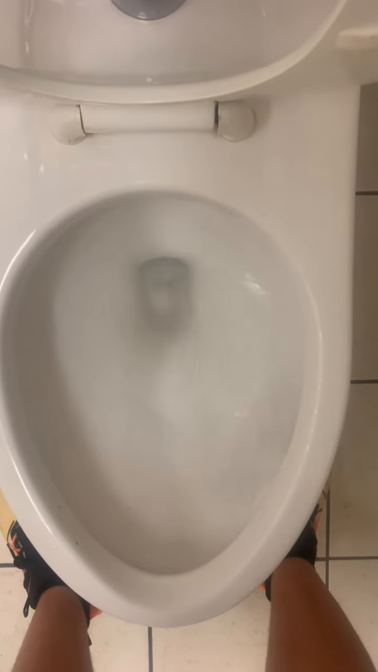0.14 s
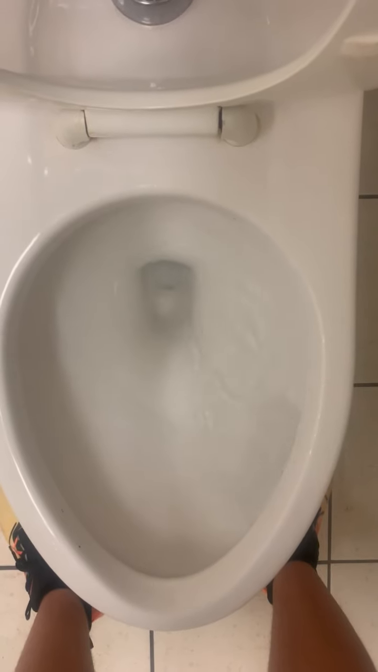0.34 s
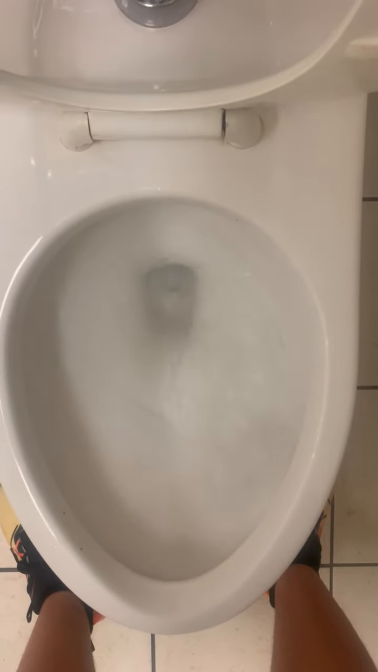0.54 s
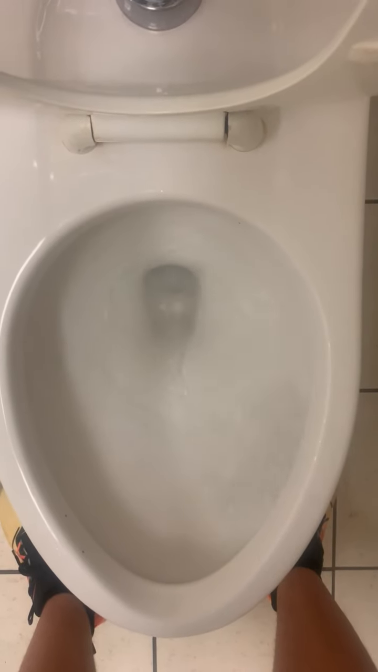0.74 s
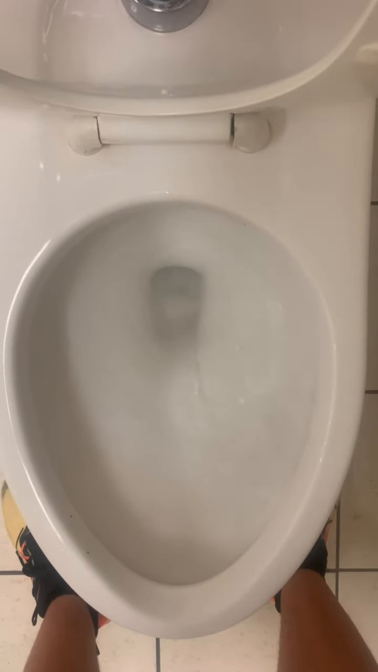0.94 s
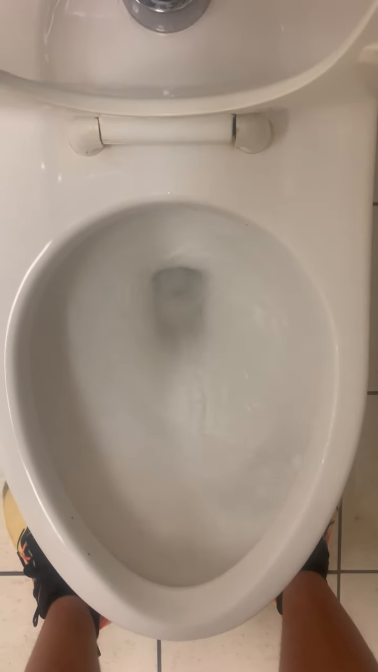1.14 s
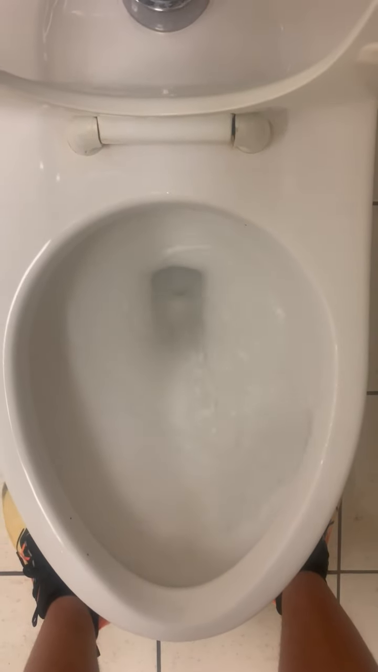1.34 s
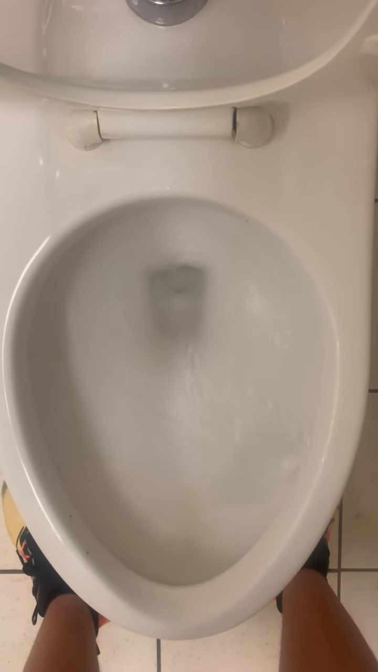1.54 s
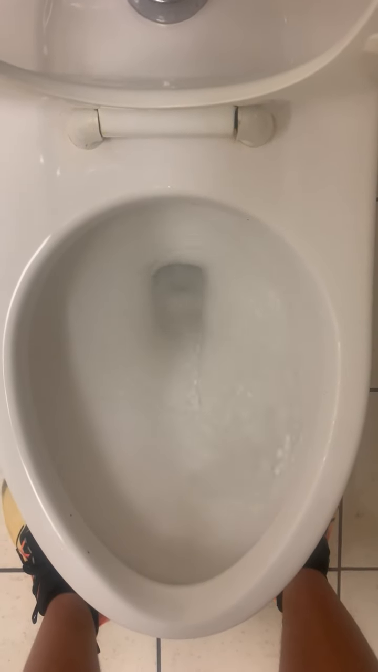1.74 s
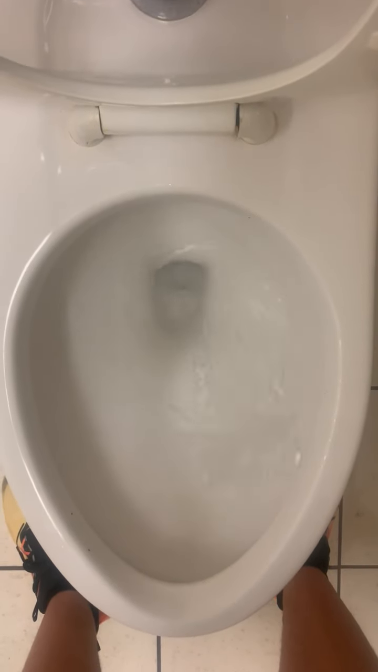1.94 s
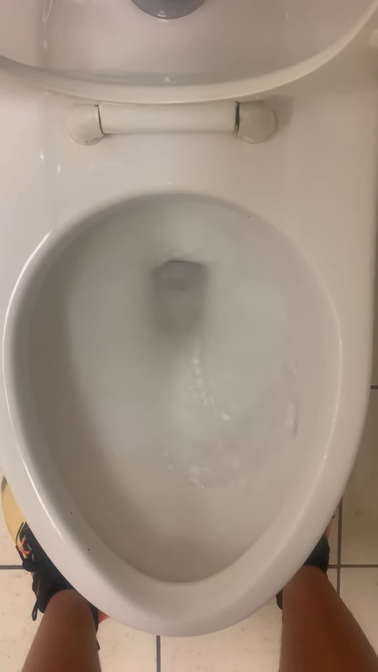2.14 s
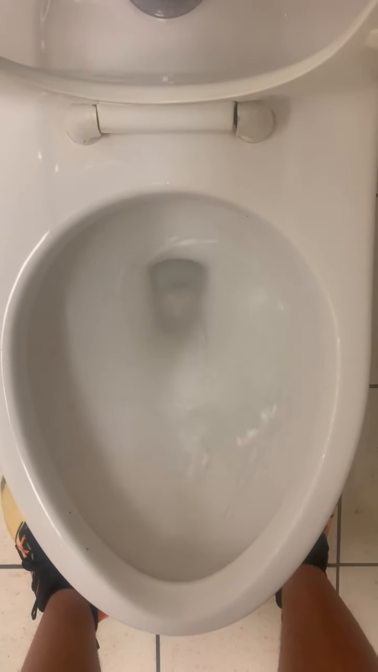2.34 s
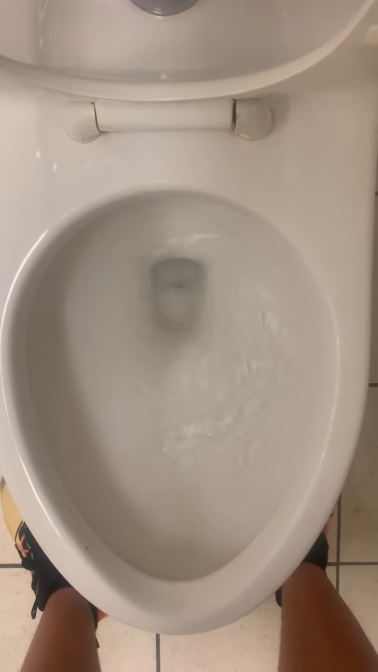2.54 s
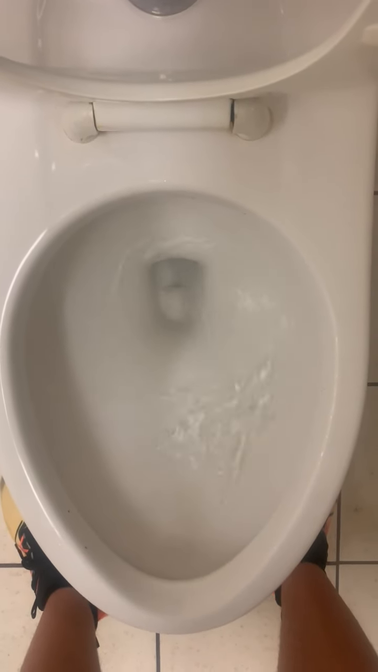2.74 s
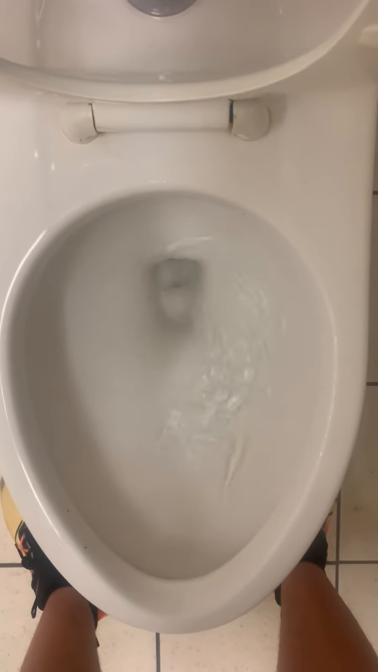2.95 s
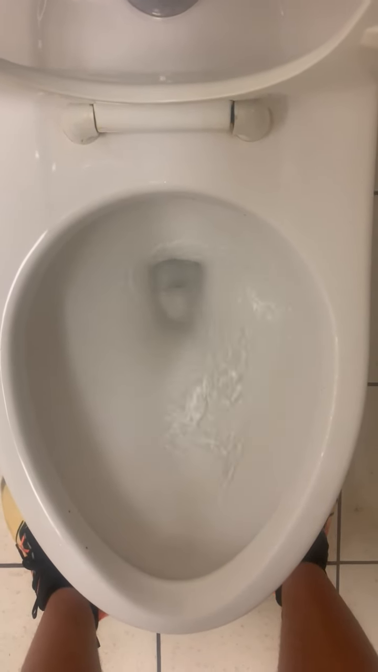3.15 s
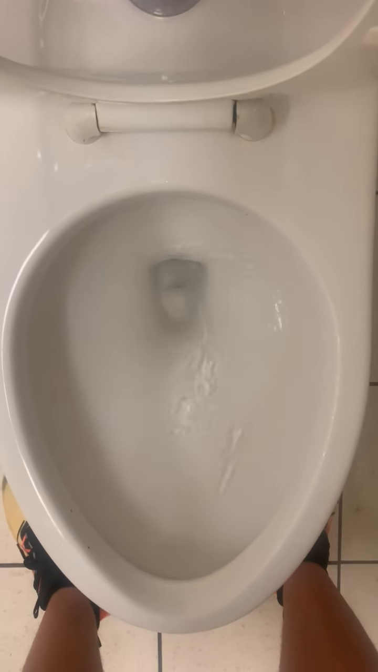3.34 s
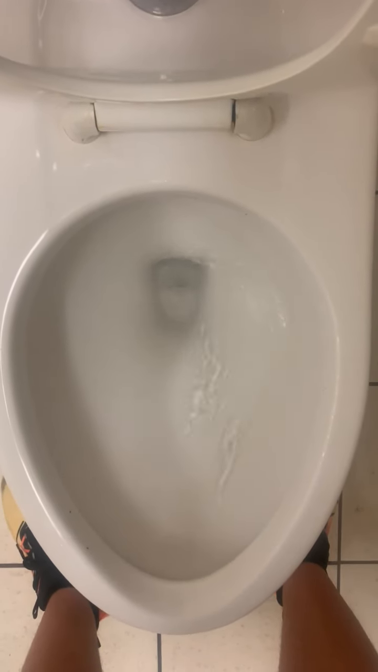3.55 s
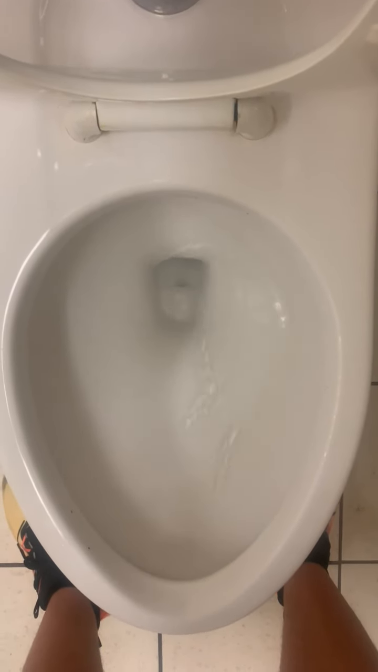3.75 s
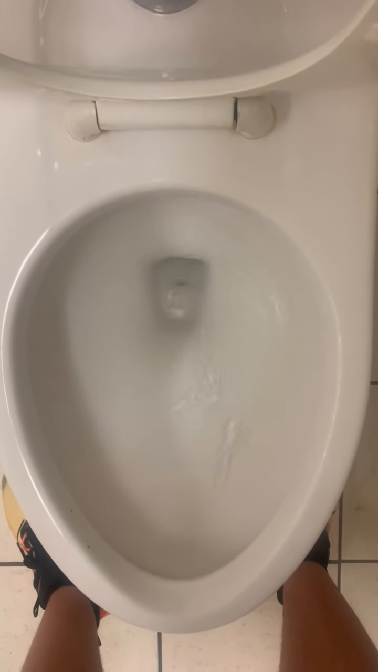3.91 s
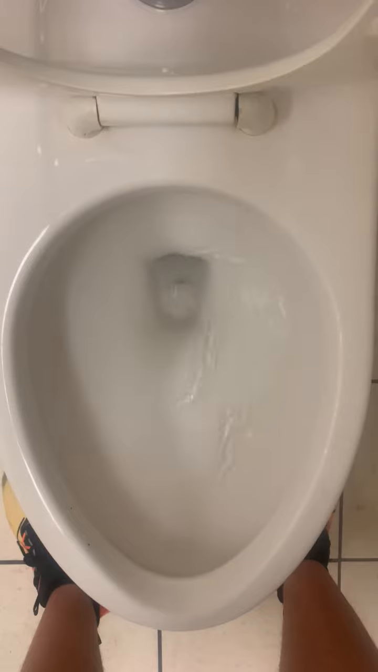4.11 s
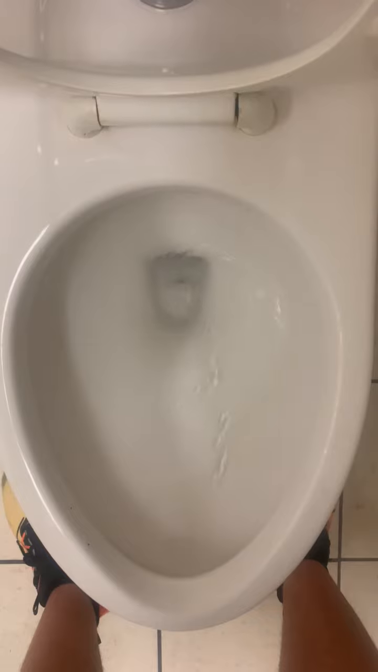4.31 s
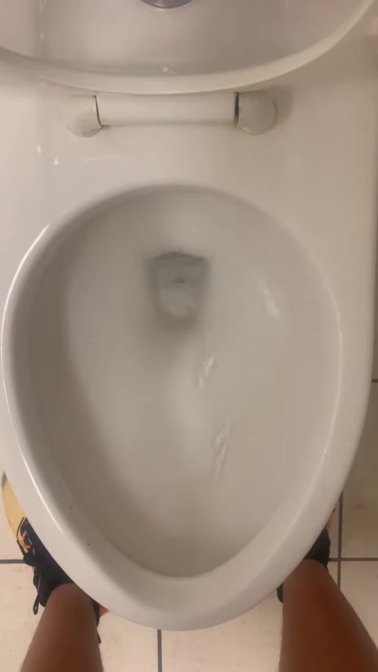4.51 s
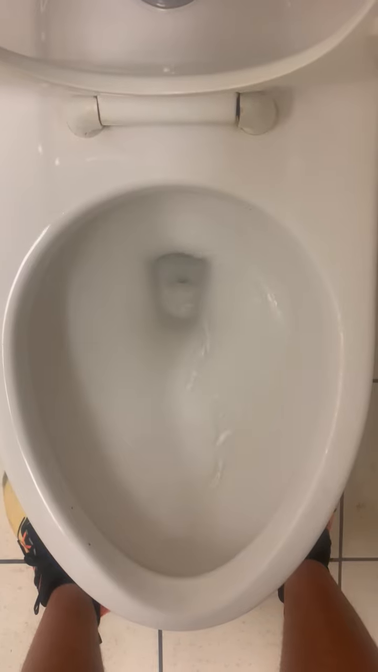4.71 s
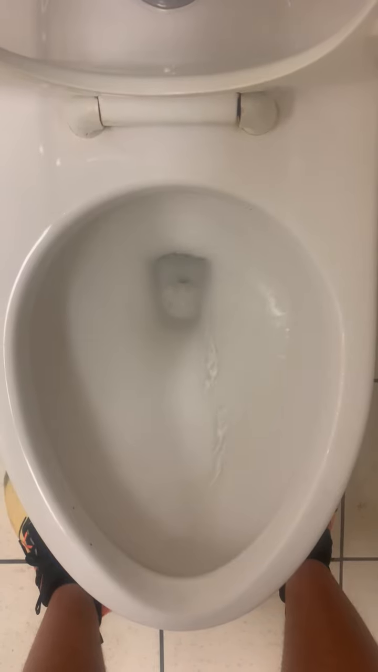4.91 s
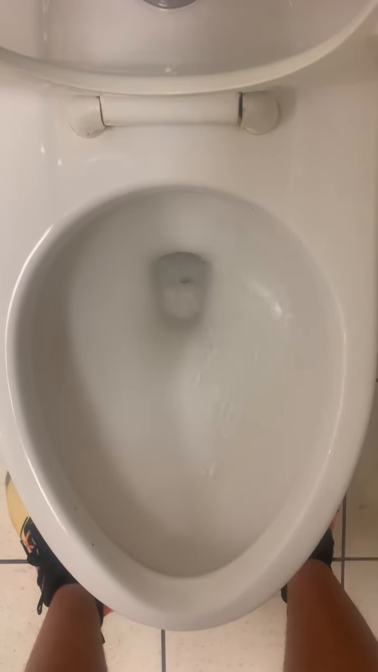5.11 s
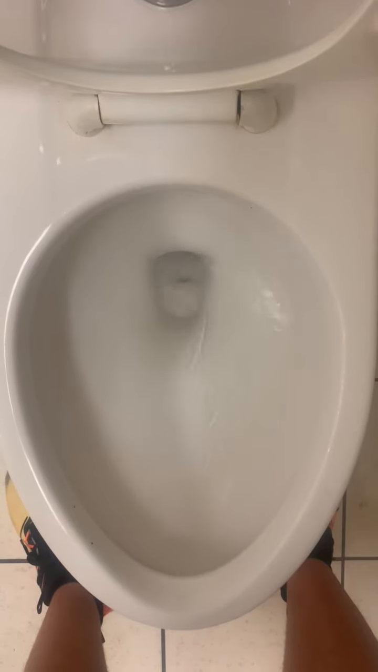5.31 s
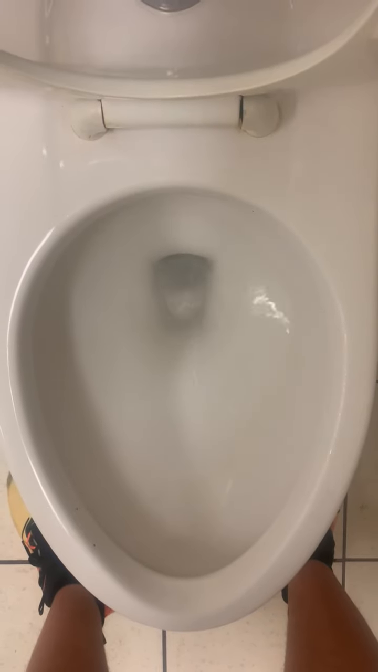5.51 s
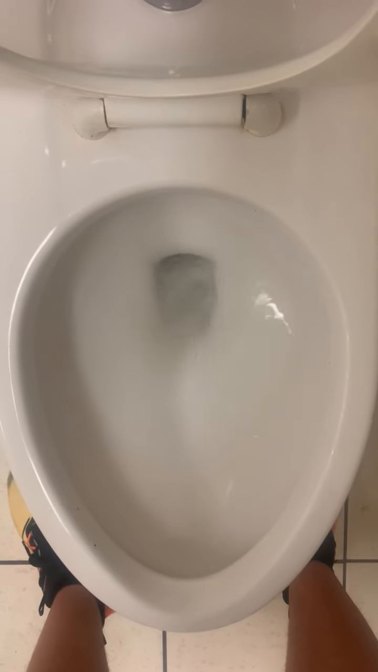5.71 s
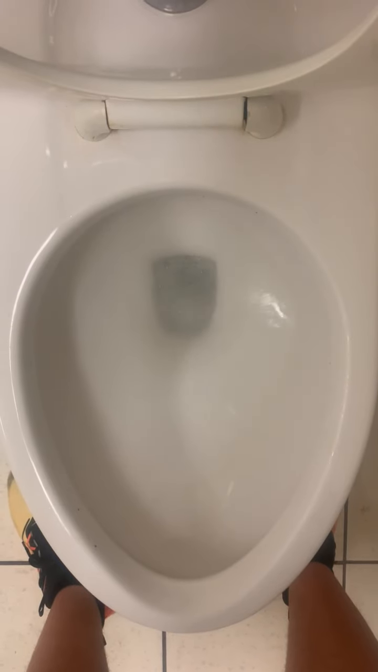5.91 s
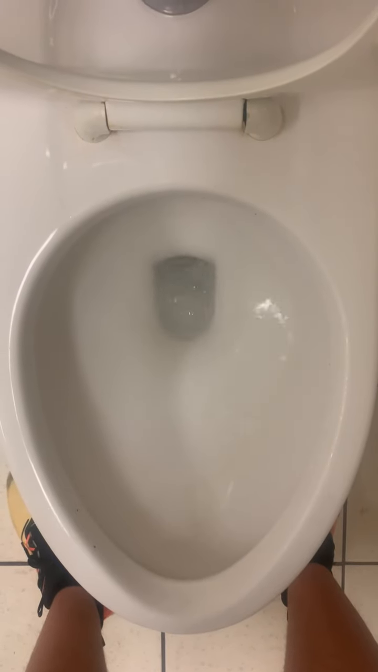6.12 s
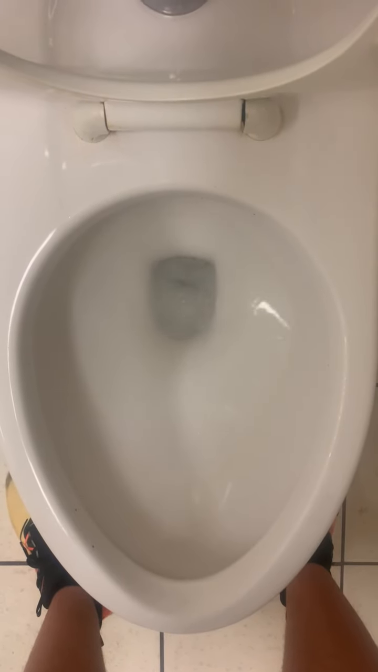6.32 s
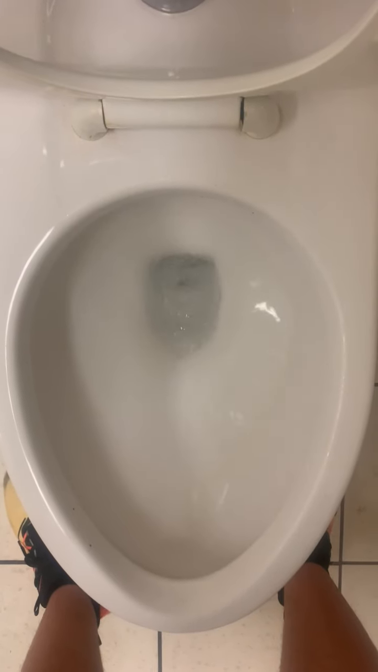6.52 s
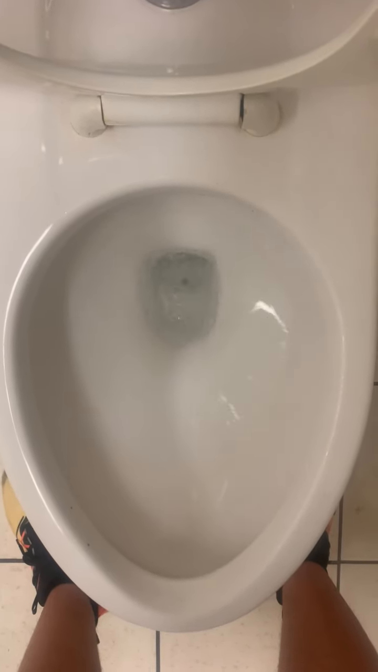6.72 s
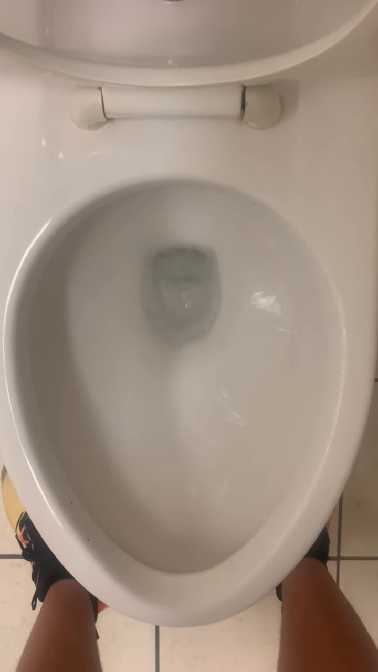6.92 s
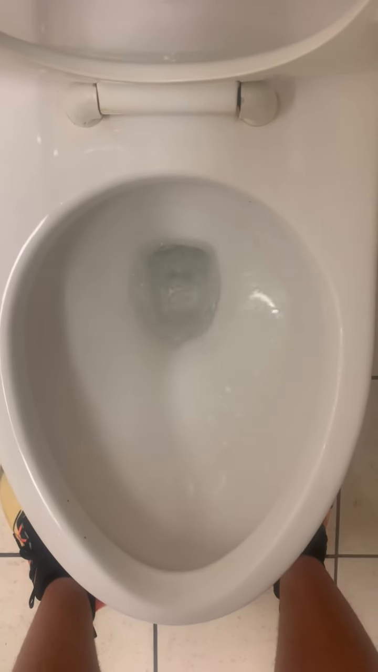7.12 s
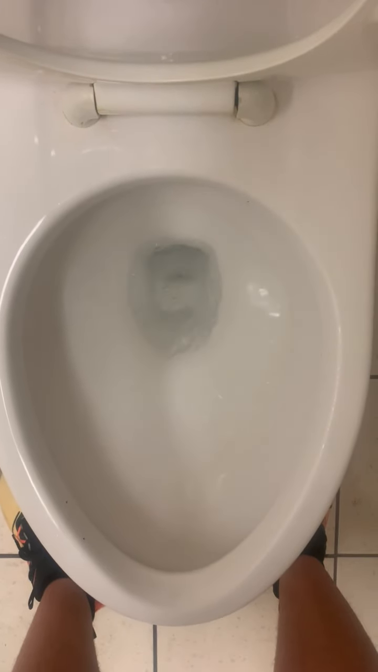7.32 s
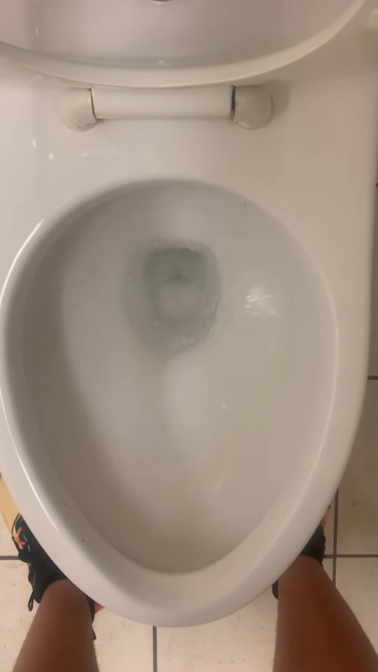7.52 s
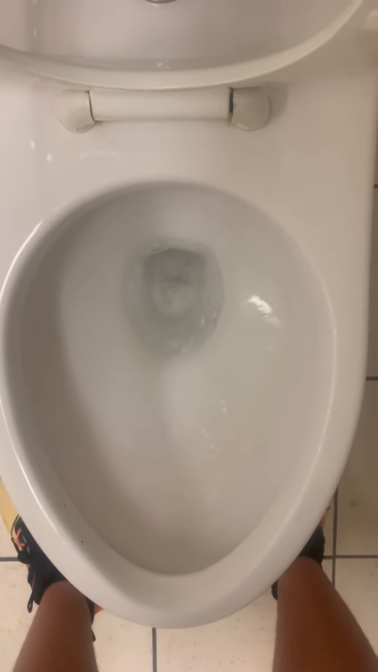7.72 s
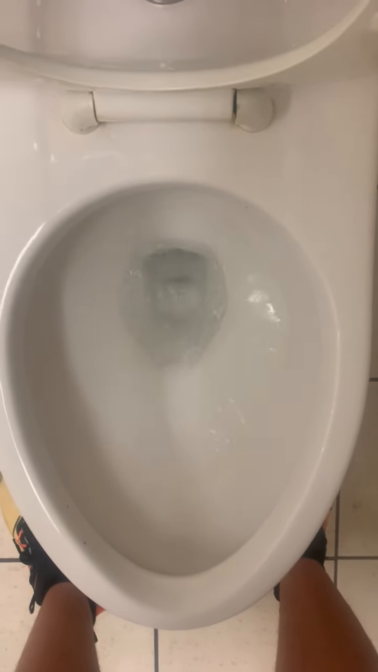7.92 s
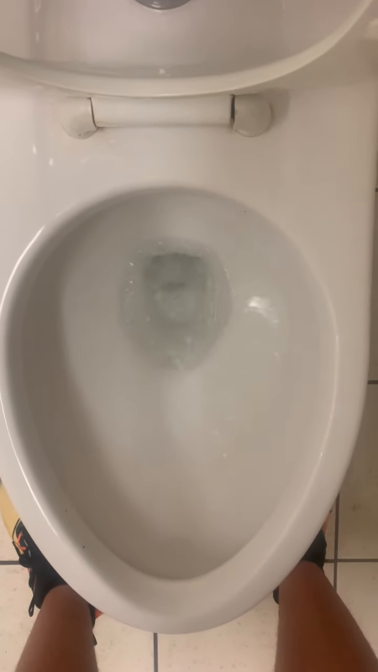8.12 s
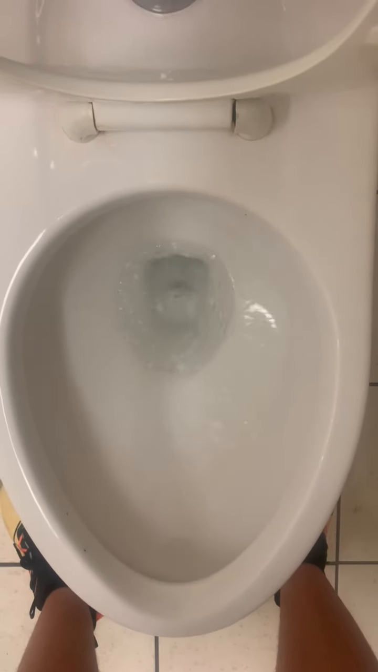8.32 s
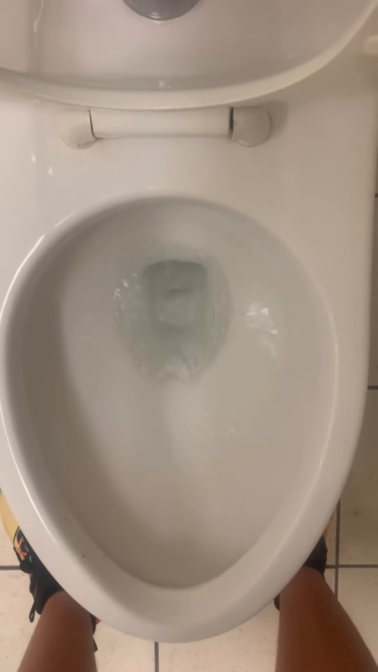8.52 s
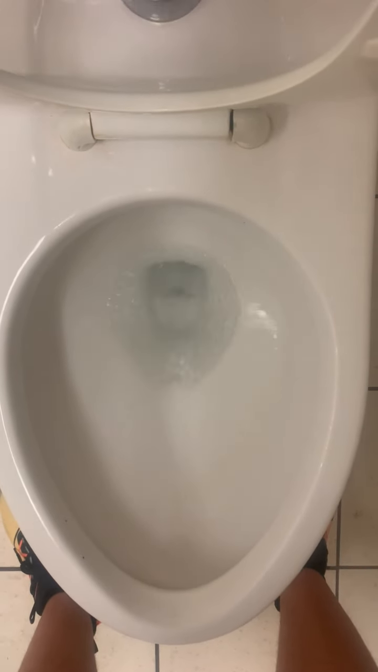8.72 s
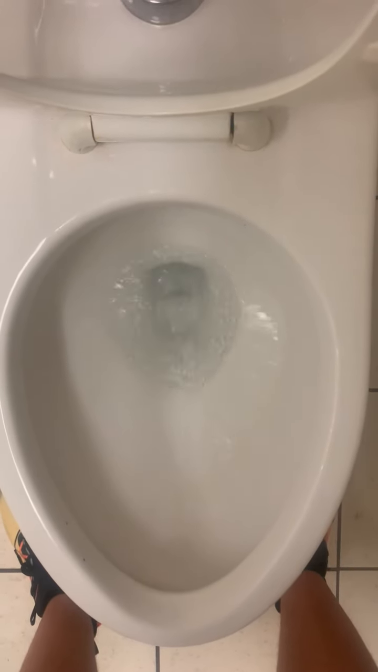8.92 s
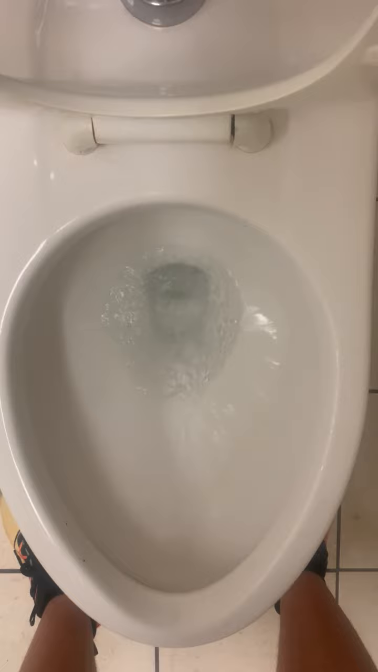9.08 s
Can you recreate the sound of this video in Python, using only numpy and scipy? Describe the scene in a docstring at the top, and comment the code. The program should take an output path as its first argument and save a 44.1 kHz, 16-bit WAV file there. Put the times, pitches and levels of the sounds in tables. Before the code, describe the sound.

Close stereo sound of a powerful flush in a hard-walled stall: wet, splashy rush with rapid mid-pitched bubbling and sharp spatters on porcelain. The gurgling is thickest in the first two seconds, then becomes patchier as the spray thins and dulls. The valve shuts quickly near six seconds. The near-quiet ending holds fizzing foam, scattered drips, a soft refilling burble and low ventilation rumble, with short tiled echoes.

```python
"""Tiled restroom: a pressure-flush toilet empties below a hand-held phone. Churning water rings the
bowl and stall air, rim jets spray and splash (shaped noise), a thin tone sings in the supply pipe.
The flow dies; drops tick (noise bursts) and plop (gliding sines) while the trap refills over a pipe hum.
Two microphone ports hear the treble alike but slightly apart in time."""
import sys
import numpy as np
from scipy import signal
from scipy.fft import rfft, irfft, next_fast_len
from scipy.io import wavfile
from scipy.ndimage import uniform_filter1d, map_coordinates

SR = 44100
rng = np.random.default_rng(int(sys.argv[2]) if len(sys.argv) > 2 else 0)


def store_wav(level_fs):
    """Save 16-bit WAV to argv[1]."""
    pcm = np.round(np.clip(np.atleast_2d(level_fs), -1, 1) * 32767)
    wavfile.write(sys.argv[1], SR, pcm.T.astype(np.int16))


N = 403515
T = np.arange(N) / SR
VALVE_SHUT_S = 5.78

# air modes of the tiled stall: pitch_hz, width_hz, peak_density_db (relative)
STALL_MODES = [(203.5, 9.8, -12.5), (264, 15.7, -14), (321.7, 14, -7), (376.6, 18, -8.5),
               (461, 16.6, -16.5), (508.3, 19, -14), (596, 80, -24), (712, 34, -14.5)]


def undb(db):
    """Decibels to amplitude factor."""
    return np.exp(np.asarray(db) * (np.log(10) / 20))


def unit(x):
    """Scale to RMS 1."""
    return x / np.sqrt(np.mean(x ** 2))


def noise():
    """White noise, the raw turbulence."""
    return rng.standard_normal(N)


def curve(table):
    """Columns joined by straight lines in time."""
    s, *columns = np.transpose(table)
    return [np.interp(T, s, c) for c in columns]


def walk(rate_hz):
    """Random levels held 1 / rate s and smoothed twice; spread 1."""
    hold = int(SR / rate_hz)
    steps = np.repeat(rng.standard_normal(N // hold + 1), hold)
    slewed = uniform_filter1d(uniform_filter1d(steps, hold), hold)[:N]
    return slewed / slewed.std()


def band(x, hz, octaves):
    """Steep band-pass around a centre."""
    lo_hz = hz * 2 ** (-octaves / 2)
    hi_hz = min(hz * 2 ** (octaves / 2), .45 * SR)
    return signal.sosfilt(signal.butter(3, [lo_hz, hi_hz], "band", fs=SR, output="sos"), x)


def ring(x, hz, width_hz):
    """One resonance, gain 1 at its centre."""
    return signal.lfilter(*signal.iirpeak(hz, hz / width_hz, SR), x)


def gusts(rate_hz, spread_db, fall_s):
    """dB bumps of small random splashes: quick rise, slower fall."""
    when, size = rng.random((int(rate_hz * N / SR), 2)).T
    hits = np.zeros(N)
    hits[(when * N).astype(int)] = undb(spread_db * np.minimum(-np.log(1 - size), 3.5))
    energy = signal.lfilter([1], [1, -np.exp(-1 / (fall_s * SR))], hits)
    return 10 * np.log10(1 + uniform_filter1d(energy, SR // 300))


def patchy(spectrum, shared_db, own_db, own_rate_hz, spit_hz=0, tilt_db=0):
    """Third-octave bands of noise; each flickers and can spit alone on top of a shared swell."""
    hz, density_db = np.transpose(spectrum)
    out = np.zeros(N)
    for f in hz[0] * 2 ** np.arange(0, np.log2(hz[-1] / hz[0]), 1 / 3):
        level_db = np.interp(np.log(f), np.log(hz), density_db)
        level_db += 10 * np.log10(f)  # density to band power
        level_db = level_db + own_db * walk(own_rate_hz)
        level_db += tilt_db * np.log2(max(f, 4500) / 7000)  # dB per octave, flat below 4.5 kHz
        if spit_hz:
            level_db += gusts(spit_hz, 3.8, 0.005)
        out += undb(level_db + shared_db) * unit(band(noise(), f, 1 / 3))
    return unit(out)


def modes(table, flicker_db, rate_hz):
    """Air modes, each shaken by its own unsteady noise."""
    out = np.zeros(N)
    for hz, width_hz, db in table:
        tone = unit(ring(noise(), hz, width_hz)) * np.sqrt(width_hz)  # level is per Hz at the peak
        out += undb(db + flicker_db * walk(rate_hz)) * tone
    return unit(out)


def bubbles(rate_hz, low_hz, octaves, cycles, spread_db):
    """Random bubbles: short fading sines that glide up, each with its own random pitch and loudness."""
    out, t = np.zeros(N + SR), np.arange(SR // 20) / SR
    for when, pitch, softness in rng.random((int(rate_hz * N / SR), 3)):
        hz = low_hz * 2 ** (octaves * pitch)
        age = t * hz / cycles
        shape = np.minimum(4 * age, 1) * np.exp(-2.5 * age)
        tone = np.sin(2 * np.pi * hz * t * (1 + 0.053 * age)) * shape
        out[int(when * N):][:len(t)] += undb(-spread_db * softness) * tone
    return unit(out[:N])


def flush():
    """Churning water drives bowl and stall air; the rim jets break into spitting spray."""
    # flow of the flush: start_s, churn_db (before part offsets), rim_spray_db, stall_boom_db
    flow = [(0.0, -26.5, -24, -36.5), (0.25, -29.5, -25.5, -37.5), (0.6, -27, -25.5, -37.5),
            (0.9, -32.5, -25.5, -38), (1.05, -27.5, -24.5, -34), (1.2, -25, -26, -35.5),
            (1.4, -31, -25, -37.5), (1.48, -29.5, -29, -37), (1.68, -30, -25, -39),
            (2.0, -35.5, -26.5, -39.5), (2.22, -28.5, -28, -41), (2.5, -36, -27, -44),
            (2.8, -30.5, -29.5, -44), (3.0, -36, -31.5, -46), (3.45, -32.5, -30, -45),
            (4.4, -42, -31.5, -45.5), (4.9, -36.5, -31.5, -48.5), (5.05, -40, -34.5, -46),
            (5.22, -46, -38, -45.5), (5.4, -51, -41, -53), (5.5, -46, -47, -53.5), (5.6, -49, -53, -63),
            (5.95, -68, -79, -77)]
    # lumps of the gurgle in the bowl: start_s, level_db (before offset)
    lumps = [(0.0, -29.5), (0.08, -36), (0.11, -25), (0.14, -26), (0.17, -25), (0.3, -29), (0.34, -25),
             (0.39, -29.5), (0.59, -22.5), (0.64, -31), (0.67, -24), (0.73, -28), (0.76, -22),
             (0.84, -28.5), (0.89, -26), (1.08, -41), (1.23, -26), (1.28, -35.5), (1.45, -29), (1.46, -27),
             (1.59, -26.5), (1.65, -27), (1.74, -32), (1.92, -26.5), (2.04, -38), (2.06, -31.5),
             (2.39, -32), (2.4, -42), (2.74, -42.5), (2.81, -27.5), (2.82, -33.5), (2.96, -41),
             (3.46, -33.5), (3.49, -29.5), (3.52, -37.5), (4.12, -35.5), (4.38, -40.5), (4.41, -36.5),
             (4.63, -41.5), (4.71, -36.5), (4.82, -47), (4.87, -38), (5.47, -47), (5.53, -49.5),
             (5.56, -50.5), (5.67, -50), (5.72, -62), (5.95, -71.5)]
    # broad wash: pitch_hz, density_db (relative, per Hz)
    wash_spectrum = [(450, -16.5), (600, -18), (800, -3), (950, -5), (1200, -8.5), (1600, -9), (1950, -6),
                     (2350, -12.5), (3300, -11.5), (4000, -13.5)]
    # air modes of the bowl: pitch_hz, width_hz, peak_density_db (relative)
    bowl_modes = [(879, 31, -4), (966, 16, -5.5), (951, 42, 2.5), (1013, 21, -2), (1115, 70, -22),
                  (1253, 37, 2.5), (1274, 25, -3.5), (1439, 37, 2), (1757, 31, -4), (1936, 67, -3),
                  (2716, 31, -5.5)]
    # rim spray before dulling: pitch_hz, density_db (relative, per Hz)
    spray_spectrum = [(1500, -20), (2700, -3), (3500, -2), (4500, -1), (5500, 0), (7000, -1), (8700, -1),
                      (11000, -3), (13000, -6), (16000, -9)]
    wash_offset_db, drain_offset_db, gurgle_offset_db = -1.35, -23, -0.5
    dulling = .33  # dB per octave of treble lost for each dB that the spray weakens
    valve_fade_s = 0.17

    churn_db, spray_db, boom_db = curve(flow)
    mean_db = uniform_filter1d(churn_db, SR // 2)  # the broad wash follows only the mean flow
    wash = patchy(wash_spectrum, 1.2 * walk(20) + gusts(60, 3.1, 0.0063), 1.4, 18)
    wash *= undb(mean_db + wash_offset_db)

    bowl_air = undb(1.3 * walk(16) + gusts(30, 2.8, 0.008)) * modes(bowl_modes, 2.4, 14)
    gurgle = unit(bowl_air + bubbles(90, 780.7, 0.512, 9.7, 11.5))
    gurgle *= undb(curve(lumps)[0] + gurgle_offset_db)

    drain = undb(2.8 * walk(8)) * unit(band(noise(), 100, 0.78))  # the waste pipe rumbles
    drain *= undb(churn_db + drain_offset_db)

    tilt_db = dulling * (np.maximum(spray_db, -45.5) + 28.5)
    spray_swell_db = gusts(70, 2.2, 0.003) + 0.6 * walk(13)
    spray = patchy(spray_spectrum, spray_swell_db, 0.7, 30, spit_hz=45, tilt_db=tilt_db)
    spray *= undb(spray_db)

    boom = undb(boom_db + 1.36 * walk(11)) * modes(STALL_MODES, 1.1, 9.8)
    stop = np.clip((VALVE_SHUT_S - T) / valve_fade_s, 0, 1)
    return stop * (wash + gurgle + drain + spray + boom)


def pipe_tone():
    """Supply pipe: a thin sine whose pitch and level waver at random around a level curve."""
    # start_s, rms_db
    tone_levels = [(0.0, -38), (0.11, -57), (0.19, -35), (0.65, -44), (0.81, -36), (1.11, -50), (1.28, -38),
                   (1.34, -57.5), (1.39, -35.5), (1.54, -34.5), (1.73, -50), (1.79, -37), (1.85, -52),
                   (2.3, -50), (2.35, -38), (2.42, -50), (2.63, -41), (2.74, -52.5), (3.07, -38.5),
                   (3.13, -82), (3.27, -44.5), (3.54, -55), (3.57, -42.5), (4.07, -74), (4.1, -45.5),
                   (4.41, -70), (4.51, -46), (5.54, -65.5), (5.6, -68), (9.15, -68)]
    centre_hz, wander_hz = 319.7, 2.62
    phase = 2 * np.pi * np.cumsum(centre_hz + wander_hz * walk(30)) / SR
    return np.sqrt(2) * undb(curve(tone_levels)[0] + 1.755 * walk(17)) * np.sin(phase)


def rumble():
    """Pipe hum, a sine slightly unsteady in pitch, over low noise of ventilation air."""
    # pipe hum: start_s, rms_db
    hum_levels = [(0.0, -54.5), (0.2, -60), (0.36, -67.5), (0.74, -48.5), (2.16, -48.5), (2.21, -54),
                  (2.93, -47.5), (3.9, -49), (4.15, -61), (4.21, -49), (4.46, -45), (4.51, -56),
                  (5.17, -56.5), (5.25, -49), (5.78, -52), (6.01, -62), (6.06, -50), (6.3, -46),
                  (6.47, -51), (7.47, -45), (7.54, -52), (7.65, -46), (9.05, -41.5), (9.15, -48)]
    # ventilation: pitch_hz, density_db (relative, per Hz)
    air_spectrum = [(30, -21), (45, -7), (70, -5.5), (90, -0.5), (122, -4), (150, -14.5), (200, -14.5),
                    (400, -28)]
    hum_hz, air_db = 54.1, -52
    phase = 2 * np.pi * np.cumsum(hum_hz + 0.47 * walk(2.9)) / SR
    hum = np.sqrt(2) * undb(curve(hum_levels)[0]) * np.sin(phase)
    return hum + undb(air_db) * patchy(air_spectrum, 0.98 * walk(2.4), 1.25, 5.8)


def plops():
    """Each trapped bubble starts sharply and rings as a fading sine that glides up a little."""
    # bubbles and plops: start_s, peak_db (before decay), pitch_hz, t60_s
    plop_rows = [(0.101, -16, 910, 0.049), (0.166, -15, 870, 0.049), (0.2, -16, 870, 0.059),
                 (0.298, -22.5, 926, 0.037), (0.325, -12, 930, 0.04), (0.34, -12, 961, 0.055),
                 (0.446, -15, 900, 0.037), (0.475, -13.5, 1020, 0.037), (0.505, -15.5, 991, 0.037),
                 (0.523, -14.5, 920, 0.045), (0.582, -15, 940, 0.044), (0.652, -17, 1010, 0.04),
                 (0.666, -17, 915, 0.04), (0.693, -19, 950, 0.04), (0.755, -17.5, 940, 0.055),
                 (0.783, -14, 1020, 0.04), (0.879, -15.5, 1000, 0.047), (0.897, -14, 1050, 0.044),
                 (0.949, -14.5, 880, 0.04), (1.225, -20.5, 880, 0.037), (1.452, -21.5, 961, 0.031),
                 (1.47, -12.5, 872, 0.051), (1.564, -16.5, 880, 0.04), (1.631, -19.5, 1090, 0.052),
                 (1.659, -20, 894, 0.048), (1.782, -21, 1040, 0.035), (1.895, -21, 960, 0.052),
                 (2.794, -13.5, 952, 0.033), (3.388, -26, 980, 0.04), (3.478, -12.5, 923, 0.03),
                 (3.853, -22, 950, 0.045), (4.913, -25, 926, 0.04), (5.519, -33, 1110, 0.04),
                 (5.584, -42, 953, 0.034), (5.658, -42, 880, 0.04), (6.329, -41, 778, 0.04),
                 (7.437, -45, 1210, 0.04), (4.6543, -28, 1440, 0.044), (6.4103, -47, 1570, 0.05),
                 (7.1247, -48, 1470, 0.05), (7.1696, -46, 1540, 0.05), (7.204, -48, 1690, 0.05),
                 (7.3694, -47, 1700, 0.05), (7.5188, -47, 1730, 0.05), (5.324, -40, 1970, .04),
                 (5.359, -33, 864, .05), (5.398, -23, 900, .025), (5.42, -32, 900, .04),
                 (5.453, -26, 1000, 0.023), (5.457, -30, 2540, .04), (5.622, -28, 1100, 0.02),
                 (6.226, -44, 2070, 0.073), (6.332, -49, 2060, .07), (6.6225, -36, 1424, 0.031),
                 (8.852, -53, 1670, .16), (6.525, -39, 312.5, .3), (8.154, -38.5, 305, 0.15),
                 (8.25, -50, 318, .2), (8.83, -52, 200, .2)]
    rise_cycles, glide_per_s = 1.5, 0.54  # pitch climbs by twice the glide, as a fraction per second
    out, t = np.zeros(N + SR), np.arange(SR // 4) / SR
    for s, db, hz, t60_s in plop_rows:
        shape = undb(db) * np.minimum(t * hz / rise_cycles, 1) * 1000 ** (-t / t60_s)
        out[int(s * SR):][:len(t)] += shape * np.sin(2 * np.pi * hz * (t + glide_per_s * t ** 2))
    return out[:N]


def ticks():
    """Each splash or drop on porcelain is a broad snap plus a longer burst of fizz in one band."""
    # splashes and drops: start_s, fizz_peak_db, centre_hz, width_octaves
    tick_rows = [(0.267, -15, 9900, .9), (0.5848, -11.5, 7250, 0.92), (0.609, -13, 8600, 1.5),
                 (0.885, -11.5, 6900, 1), (0.98, -11.5, 8000, 0.99), (1.511, -16.5, 6520, 0.79),
                 (1.7633, -15, 10100, 0.89), (2.0207, -15, 7800, 1.1), (2.289, -15, 9030, 1.2),
                 (2.3814, -17, 9200, 1.4), (2.637, -13, 9700, 1.3), (2.932, -18.5, 7900, 1.2),
                 (3.535, -19.5, 8900, 0.55), (4.0446, -23.5, 7300, .8), (4.071, -18, 7620, 1.2),
                 (4.316, -25, 9300, 1.5), (5.3293, -35, 6360, 1), (5.399, -30, 4970, 1.4),
                 (5.407, -42, 2500, .3), (5.468, -38, 3300, 0.52), (5.499, -35, 3800, 0.38),
                 (5.5345, -36, 5400, 0.82), (5.6011, -47, 7560, 0.72), (5.621, -24, 6000, 3.6),
                 (5.6315, -35, 10860, 0.55), (5.6735, -46, 6070, .5), (5.7274, -49.5, 7500, 1.5),
                 (5.747, -44, 3300, .4), (5.8166, -44, 9700, 2.1), (5.9603, -53, 7100, .9),
                 (5.9957, -45, 5600, .55), (6.059, -41, 9500, 0.25), (6.1255, -63, 8000, 1.2),
                 (6.1479, -61, 6420, .8), (6.1887, -50, 6500, 1.7), (6.225, -56, 10500, 1.1),
                 (6.307, -58, 7810, 0.83), (6.3788, -54, 7500, 0.7), (6.4782, -59, 8900, 1.6),
                 (6.52, -45, 5160, 0.27), (6.5719, -51, 8700, .55), (6.6232, -47, 7000, 2.5),
                 (6.6347, -47.5, 5830, 0.4), (6.6432, -49, 11200, .8), (6.7564, -46, 10100, 1.4),
                 (6.778, -56, 8500, .9), (6.8932, -57.5, 8600, .6), (6.94, -47, 5860, 1.3),
                 (6.959, -54, 8100, .9), (6.9984, -48, 8500, 1.5), (7.0233, -48, 8200, 1.3),
                 (7.107, -51, 6300, 1.3), (7.18, -61, 13000, .5), (7.1995, -55.5, 7800, 1),
                 (7.238, -61, 10300, .4), (7.408, -59, 9000, 1.4), (7.5981, -66, 6330, .6),
                 (7.9393, -58, 5600, 0.43), (8.064, -50, 6070, .4), (8.3997, -52, 10230, .55),
                 (8.4167, -55, 10200, .4), (8.4281, -54, 9860, 0.37), (8.586, -43, 9700, 0.2)]
    fizz_t60_s, snap_t60_s, snap_db = 0.024, 0.0043, -11  # snap level is against the fizz
    out, t = np.zeros(N + SR), np.arange(SR // 10) / SR
    for s, db, hz, octaves in tick_rows + spatter():
        water = rng.standard_normal(len(t)) * np.minimum(t / 0.002, 1)  # 2 ms rise
        fizz = band(water * 1000 ** (-t / fizz_t60_s), hz, octaves)
        snap = band(water * 1000 ** (-t / snap_t60_s), 6000, 3.5)
        burst = fizz / np.abs(fizz).max() + undb(snap_db) * snap / np.abs(snap).max()
        out[int(s * SR):][:len(t)] += undb(db) * burst
    return out[:N]


def refill():
    """A thin bubbling trickle, a burble ringing the trap, foam that fizzes out, and stall air."""
    # refill: start_s, trickle_db, trap_burble_db (both before their added bubbles)
    refill_levels = [(5.6, -54, -68), (5.75, -53.5, -74), (6.3, -54, -75), (6.5, -54, -66),
                     (6.85, -54, -70.5), (7.1, -55.5, -59), (7.35, -53.5, -59.5), (7.6, -55, -62),
                     (8.0, -54.5, -74), (8.08, -53.5, -58), (8.25, -51.5, -57), (8.42, -53, -60),
                     (8.62, -59, -73.5), (9.15, -65, -78.5)]
    # trickle: pitch_hz, density_db (relative, per Hz)
    trickle_spectrum = [(450, -3), (750, 0), (1200, -1), (1750, -1.5), (2200, -6), (2800, -11), (3500, -16),
                        (4500, -18), (5600, -19), (7000, -32), (8700, -35), (12000, -44)]
    # air modes of the trap: pitch_hz, width_hz, peak_density_db (relative)
    trap_modes = [(1238, 114, 0), (1560, 92, 1), (1890, 25, 4), (2080, 110, -11), (1700, 47, -1)]
    # foam left by the flush: pitch_hz, density_db (relative, per Hz)
    fizz_spectrum = [(3200, -1), (4500, 4), (5600, 2), (7300, -11), (8900, -5), (11000, -11), (16000, -23)]
    fizz_db, fizz_fall_db_per_s = -58.5, 10  # level at 5.5 s, then falling
    boom_db, boom_fade_db, boom_fade_start_s, boom_fade_length_s = -58.5, 4, 8.4, .3

    trickle_db, burble_db = curve(refill_levels)
    trickle = patchy(trickle_spectrum, 0.6 * walk(6.2), 1.7, 16)
    trickle += undb(-9) * bubbles(140, 700, 1.58, 13, 18)
    burble = modes(trap_modes, 3.8, 14) + undb(-5.5) * bubbles(70, 1303, 0.747, 24, 17)

    fizz = patchy(fizz_spectrum, gusts(35, 4.2, 0.004) + 1.2 * walk(17), 2.2, 20, spit_hz=24)
    fizz *= undb(fizz_db - fizz_fall_db_per_s * (T - 5.5))

    # the stall air quietens as the trickle stops
    fade_db = boom_fade_db * np.clip((T - boom_fade_start_s) / boom_fade_length_s, 0, 1)
    boom = undb(boom_db - fade_db + 0.67 * walk(7)) * modes(STALL_MODES, 0.6, 5.8)

    start = np.clip((T - 5.3) / 0.18, 0, 1)
    return start * (undb(trickle_db) * trickle + undb(burble_db) * burble + fizz + boom)


def spatter():
    """Tick rows for many small drops off the rim after the valve shuts, weaker as the bowl dries."""
    rate_hz, length_s = 22, 2.5
    top_db, fall_db_per_s, spread_db = -57, 6, 10
    when, softness, pitch, wide = rng.random((int(rate_hz * length_s), 4)).T
    late_s = length_s * when
    db = top_db - fall_db_per_s * late_s - spread_db * softness
    return list(zip(VALVE_SHUT_S + late_s, db, 5000 * 2 ** (1.4 * pitch), .3 + wide))


def tiles(x, room_db):
    """Direct sound plus a dense fading tail from the tiled walls, duller than the direct sound."""
    t60_s = 0.29
    t = np.arange(SR // 2) / SR
    tail = rng.standard_normal(len(t)) * 1000 ** (-t / t60_s) * (t > .004)
    tail = signal.sosfilt(signal.butter(1, 5000, fs=SR, output="sos"), tail)
    return x + undb(room_db) * signal.fftconvolve(x, tail / np.linalg.norm(tail))[:N]


def ports(x):
    """The right port hears a lagging copy mixed with a scattered one."""
    # the two ports: pitch_hz, likeness (0-1), right_lag_rad, left_minus_right_db
    port_rows = [(60, 1, 0, 0), (250, .98, -.15, 1.2), (500, .8, -.6, -.5), (680, .3, 0, -2),
                 (900, .9, -.5, -2.5), (1300, .8, -.3, -1), (1900, .78, .3, -2.2), (2400, .4, 1.3, -3),
                 (3100, .6, 1.3, -2), (3700, .87, 1.9, 0), (4300, .998, 2.55, 0)]
    treble_lag_s = 0.0002382  # above the last row the lag grows as a plain delay
    size = next_fast_len(N + SR)
    f = np.arange(size // 2 + 1) * SR / size
    hz, *columns = np.transpose(port_rows)
    like, lag_rad, pan_db = (np.interp(f, hz, c) for c in columns)
    lag_rad = lag_rad + 2 * np.pi * treble_lag_s * np.maximum(f - hz[-1], 0)
    # many paths of unlike length: a new phase every 20 Hz, colour kept
    turns = rng.standard_normal(SR // 40 + 2)
    scatter = np.exp(3j * map_coordinates(turns, [f / 20], order=3))
    mix = like * np.exp(-1j * lag_rad) + np.sqrt(1 - like ** 2) * scatter
    spectrum = rfft(x, size)
    left = spectrum * undb(pan_db / 2)
    right = spectrum * undb(-pan_db / 2) * mix
    return irfft([left, right], size)[:, :N]


def scene():
    """Single splashes and bubbles echo off the tiles; the steady rush already carries room modes."""
    steady = flush() + pipe_tone() + rumble() + refill()
    single = tiles(plops(), room_db=-15) + tiles(ticks(), room_db=-11)
    return ports(steady + single)


def record(dry):
    """Each microphone adds its own faint hiss; the phone cuts the top steeply."""
    hiss_db, top_hz = -89, 15750
    hiss = undb(hiss_db) * rng.standard_normal(dry.shape)
    return signal.sosfilt(signal.ellip(12, .2, 80, top_hz, fs=SR, output="sos"), dry + hiss)


dry = scene()
out = record(dry)
store_wav(out)
```